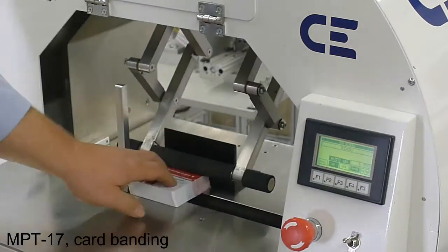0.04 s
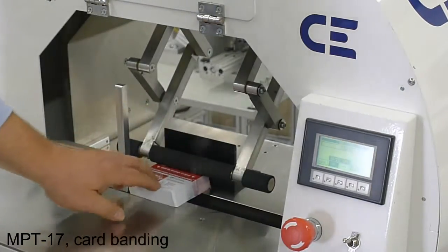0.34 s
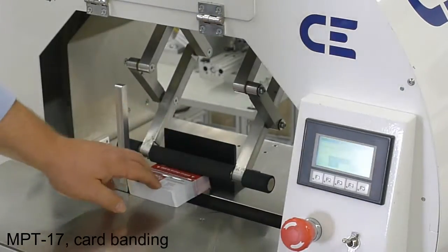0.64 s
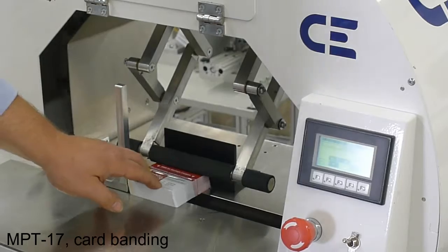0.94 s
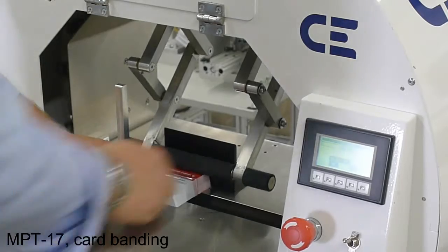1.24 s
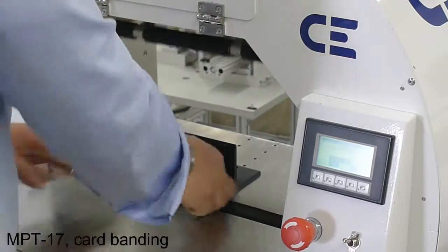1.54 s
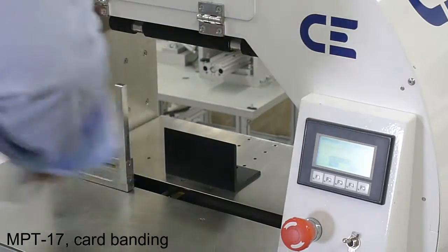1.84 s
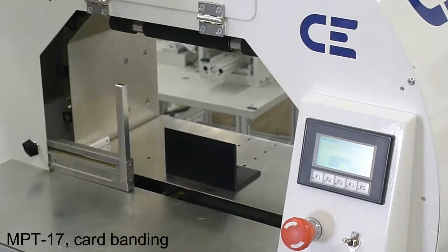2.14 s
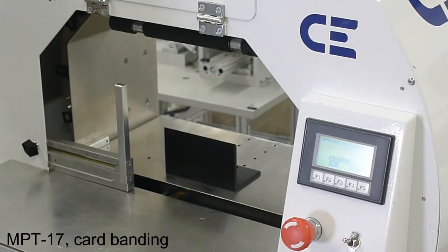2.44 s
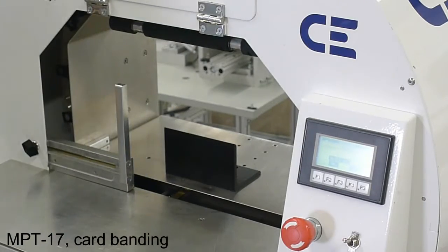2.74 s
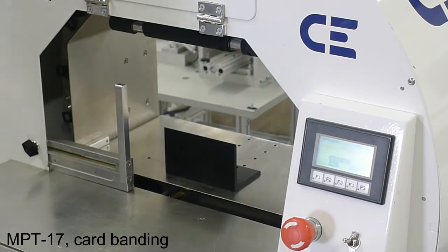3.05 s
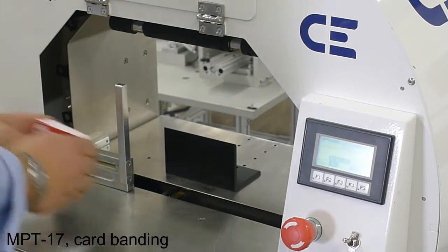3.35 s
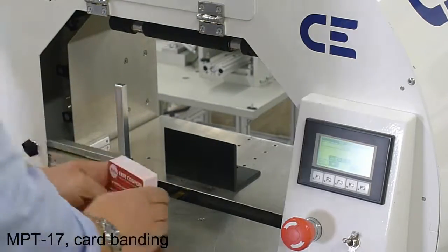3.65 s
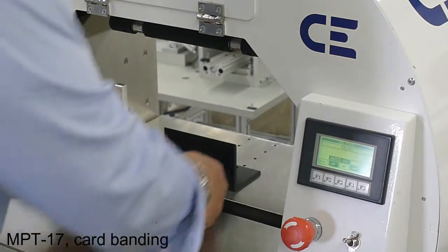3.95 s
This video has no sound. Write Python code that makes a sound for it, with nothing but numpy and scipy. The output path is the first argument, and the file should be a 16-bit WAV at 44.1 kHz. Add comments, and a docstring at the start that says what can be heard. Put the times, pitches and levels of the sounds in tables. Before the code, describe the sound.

A banding machine feeds film with a groaning rumble, cut off at 0.4 seconds by a valve snap and a hiss of air. From 0.7 to 1.5 seconds its arms rumble and clack against steel, with a tick and another air puff. It then idles with a faint hum and fan in a hard workshop. Cards rustle softly around 3 seconds and knock sharply on the table at 3.6.

```python
"""A film banding machine in a hard workshop, over a faint fan and room air. The film feed rumbles and
groans, then that sound cuts off abruptly; a valve snaps and air hisses out with a falling edge. The motor
starts to hum as the clamp and sealing arms travel and clack against the steel housing, with a relay tick
and one more puff of air. The machine idles while a pack of cards rustles in the hands and is knocked
down on its table."""
import sys
import numpy as np
from scipy import signal
from scipy.fft import rfft, irfft, next_fast_len
from scipy.io import wavfile
from scipy.ndimage import uniform_filter1d, map_coordinates

SR = 44100
rng = np.random.default_rng(int(sys.argv[2]) if len(sys.argv) > 2 else 0)


def transcribe(signal):
    """Save signal, clipped to [-1, 1], as a 16-bit WAV file at the path in sys.argv[1]."""
    frames = np.atleast_2d(signal).T
    limited = np.clip(frames, -1, 1)
    pcm = np.round(limited * 32767).astype(np.int16)
    wavfile.write(sys.argv[1], SR, pcm)


N = 176400
TIME = np.arange(N) / SR


def amp(db):
    """Decibels to gain."""
    return 10 ** (np.asarray(db) / 20)


def unit(x):
    """Scale to rms 1."""
    return x / np.sqrt(np.mean(x ** 2) + 1e-20)


def along(points, hz):
    """Read a curve of (f/Hz, value) points on a log frequency axis."""
    f, v = np.transpose(points)
    return np.interp(np.log(hz + 1), np.log(f + 1), v)


def level(rows):
    """A fader ride through (t/s, level/dB) points, muted from 30 ms beyond either end."""
    s, db = np.transpose(rows)
    return amp(np.interp(TIME, s, db)) * (TIME > s[0] - .03) * (TIME < s[-1] + .03)


def add(out, s, x):
    """Mix x into out from time s."""
    i = round(s * SR)
    out[i:i + len(x)] += x[:len(out) - i]


def filtered(x, response):
    """EQ x with a gain given as a function of frequency."""
    size = next_fast_len(len(x) + SR // 2)
    return irfft(rfft(x, size) * response(np.fft.rfftfreq(size, 1 / SR)), size)[:len(x)]


def noise(colour):
    """Noise of rms 1, coloured by (f/Hz, level/dB) points."""
    return unit(filtered(rng.standard_normal(N), lambda hz: amp(along(colour, hz))))


def wobble(rate):
    """A smooth random curve, rate knots a second."""
    knots = TIME * rate
    return map_coordinates(rng.standard_normal(int(knots[-1]) + 4), [knots])


def rings(rows, steady=0):
    """Resonances driven by noise; steady (0-1) evens out their swells."""
    hz, out = np.fft.fftfreq(N, 1 / SR), np.zeros(N)
    for centre, width, db in rows:
        band = np.fft.ifft(np.fft.fft(rng.standard_normal(N)) / (1 + (2 * (hz - centre) / width) ** 2))
        out += amp(db) * unit(band.real / np.abs(band) ** steady)
    return out


def swells(rows, width_hz=14):
    """Narrow resonances that each swell and fade once."""
    return sum(rings([(hz, width_hz, db)], steady=0.8) * np.exp(-((TIME - s) / half) ** 2)
               for s, half, hz, db in rows)


def causal(gain, size=2048):
    """Minimum-phase impulse response of energy 1: an EQ with no ring ahead of the attack."""
    cepstrum = irfft(np.log(gain(np.fft.rfftfreq(size, 1 / SR)) + 1e-6))
    cepstrum[1:size // 2] *= 2
    cepstrum[size // 2 + 1:] = 0
    impulse = irfft(np.exp(rfft(cepstrum)))
    return impulse / np.linalg.norm(impulse)


def blow(colour, t60, snap, bass_db=0, treble_db=0):
    """A sharp contact and its dense, quickly dying rattle."""
    t = np.arange(SR // 4) / SR
    rattle = rng.standard_normal(len(t)) * amp(-60 * t / t60)
    rattle[0] = snap
    tilt = [(300, bass_db), (1200, 0), (2500, 0), (8000, treble_db)]
    return signal.fftconvolve(rattle, causal(lambda hz: amp(along(colour, hz) + along(tilt, hz))))


def ringing(modes, relative_width=.012):
    """Struck steel, a little different at every blow; loose joints blur each mode's pitch."""
    t, out = np.arange(SR) / SR, np.zeros(SR)
    for hz, db, t60 in modes:
        drift = np.cumsum(rng.standard_normal(SR)) * np.sqrt(2 * np.pi * relative_width * hz / SR)
        phase = 2 * np.pi * (hz * t + rng.random()) + uniform_filter1d(drift, size=200)
        scatter_db = np.clip(rng.normal(0, 2.0), -2, 2)
        out += amp(db + scatter_db - 60 * t / t60) * np.sin(phase)
    return out * (1 - np.exp(-t / 0.0014))


def in_room(x, wet_db, build_s=0.0054):
    """x plus the reverb of the hard workshop, where the bass hangs longest."""
    decay = [(100, 1), (400, 0.65), (2000, 0.89), (4000, 0.82), (7000, 0.6), (12000, 0.74)]  # reverb time: f/Hz, t60/s
    hz, t, spectrum = signal.stft(rng.standard_normal(SR), SR, nperseg=256)
    tail = signal.istft(spectrum * amp(-60 * t / along(decay, hz)[:, None]), SR, nperseg=256)[1]
    tail *= 1 - np.exp(-np.arange(len(tail)) / SR / build_s)
    reverb = signal.fftconvolve(x, tail / np.linalg.norm(tail))
    return np.pad(x, (0, len(tail) - 1)) + amp(wet_db) * reverb


def film_feed():
    """Film drags through its guides: a fluttering rumble, groans, a short squeak, a thin air whistle."""
    ride = [(0, -27.5), (.04, -26.5), (.1, -25), (.135, -24), (.18, -27.5), (.215, -25.5), (.27, -26),
            (.41, -24.5), (.424, -28.5), (.436, -48.5), (.62, -44), (.7, -44)]  # fader on rumble and resonances: t/s, level/dB
    colour = [(24, -49), (40, -50), (69, -16), (162, -4.5), (241, -6), (417, -10), (496, -7), (881, -8.5),
              (973, -13.5), (4350, -25.5), (7520, -37.5), (12100, -46.5), (15500, -56)]  # rumble EQ: f/Hz, level/dB
    resonances = [(166, 26, -18.5), (398, 91, -16.5), (885, 38, -26), (2007, 80, -25)]  # excited by the feed: f/Hz, width/Hz, relative level/dB
    groans = [(.055, .025, 378, -22.5), (.137, .022, 382, -18.5), (.21, 0.058, 171.2, -21.5),
              (.25, 0.11, 420, -26), (.342, 0.027, 880, -27.5), (.405, 0.02, 424.5, -25)]  # one guide after another: t/s, half length/s, f/Hz, level/dB
    squeak_path = [(0.021, 1064, -34), (.045, 1072, -21), (.07, 1117, -22), (.1, 1120, -56)]  # rising squeak: t/s, f/Hz, level/dB
    whistle_band = [(11840, 600, -1.5)]  # air whistle: f/Hz, width/Hz, relative level/dB
    whistle_ride = [(0, -49), (.25, -55), (.42, -54)]  # its fader: t/s, level/dB
    rumble = amp(3.5) * noise(colour) * amp(0.69 * wobble(rate=72))
    body = rumble + amp(12.0) * rings(resonances, steady=0.44)
    s, hz, db = np.transpose(squeak_path)
    phase = 2 * np.pi * np.cumsum(np.interp(TIME, s, hz)) / SR
    squeak = np.sin(phase) * level(np.transpose([s, db]))
    return body * level(ride) + swells(groans) + squeak + rings(whistle_band) * level(whistle_ride)


def background():
    """The bed under everything: fan tones, a thin drive whine and the air of the workshop."""
    fan = [(550.6, 11, -64), (795.6, 23, -61.5), (1057, 11, -66.5)]  # fan tones: f/Hz, width/Hz, level/dB
    whine = [(14940, 20, -69)]  # drive whine: f/Hz, width/Hz, level/dB
    air_colour = [(25, -11), (55, 0.5), (120, 8), (170, 2), (330, 5), (600, -1), (1000, -1.5), (2000, -5.5),
                  (4500, -10), (8000, -17), (12000, -24), (15500, -28)]  # room tone EQ: f/Hz, level/dB
    air_ride = [(0, -60), (1.7, -52), (2.1, -49.5), (2.7, -49), (3.33, -47.5), (3.4, -43), (3.48, -46),
                (3.56, -47), (3.65, -51), (4, -48)]  # room tone fader: t/s, level/dB
    return rings(fan, steady=0.74) + rings(whine, steady=1) + noise(air_colour) * level(air_ride)


def exhaust():
    """Escaping air rasps above a sliding, unsteady resonance that weakens as the pressure falls."""
    ride = [(.414, -53), (.421, -23), (.426, -22.5), (.436, -28), (.475, -28.5), (.495, -26), (.54, -32),
            (.568, -21.5), (.6, -27), (.63, -32), (.67, -36.5), (.72, -40), (.8, -44)]  # hiss fader: t/s, level/dB
    edge = [(.425, 5650), (.44, 5900), (.468, 4280), (.484, 2200), (.53, 1820), (.565, 2370), (.585, 3220),
            (.64, 2080)]  # lowest resonance: t/s, f/Hz
    colour = [(300, -12), (2000, 1.5), (5000, -1.5), (9000, -7), (13000, -7), (15500, -13)]  # hiss EQ: f/Hz, level/dB
    width_octaves, jitter_octaves, fade_s = 0.075, 0.069, 0.076
    peak_db, below_edge_db, rasp_db = 8.5, -12.5, 3
    hz, t, spectrum = signal.stft(rng.standard_normal(N), SR, nperseg=256)
    octaves = np.log2((hz[:, None] + 1) / np.interp(t, *np.transpose(edge)))  # above the edge
    octaves += jitter_octaves * rng.standard_normal(len(t))
    pressure = np.exp(-np.maximum(t - edge[0][0], 0) / fade_s)
    peak = peak_db * pressure * np.exp(-.5 * (octaves / width_octaves) ** 2)
    shelf = below_edge_db * np.clip(-octaves / .5, 0, 1)
    # Random patches in frequency and time roughen the hiss.
    patches = uniform_filter1d(rng.standard_normal(spectrum.shape), size=3, axis=0)
    patches = unit(uniform_filter1d(patches, size=9, axis=1))
    spectrum *= amp(peak + shelf + rasp_db * patches + along(colour, hz)[:, None])
    hiss = signal.istft(spectrum, SR, nperseg=256)[1][:N]
    return unit(hiss) * level(ride)


def valve_snaps():
    """The exhaust valve snaps open, then spits again within the hiss."""
    snaps = [(0.419, -16.5), (0.4243, -30), (0.566, -30)]  # valve hits: t/s, level/dB
    colour = [(300, -19), (2500, 5), (6000, 1), (9000, -27), (13000, 2), (15500, -6)]  # snap EQ: f/Hz, level/dB
    out = np.zeros(N)
    for s, db in snaps:
        add(out, s, amp(db) * blow(colour, t60=0.025, snap=1.9))
    return out


def motor_hum():
    """The motor's low hum comes in with the arms and holds."""
    tone = [(119.46, 2.3, -50)]  # motor tone: f/Hz, width/Hz, level/dB
    ride = [(.62, -23), (.75, -0.5), (4, 1)]  # fader on that tone: t/s, level/dB
    return rings(tone, steady=1) * level(ride)


def arm_travel():
    """The swinging arms rumble along, make the frame boom and set a panel shuddering."""
    colour = [(40, -25), (90, 4.5), (380, 8.5), (600, 1.5), (1200, -1.5), (2000, -3), (2600, -9),
              (4500, -13), (8000, -27.5), (15000, -48)]  # rumble EQ: f/Hz, level/dB
    ride = [(.64, -56), (.69, -26.5), (.79, -25.5), (.9, -23), (1.04, -31.5), (1.1, -36), (1.19, -39.5),
            (1.32, -30), (1.43, -34.5), (1.52, -26.5), (1.6, -30), (1.7, -35), (1.8, -42), (2, -60)]  # rumble fader: t/s, level/dB
    frame_modes = [(83, 10, -9), (113.6, 1.9, -3.5), (138.7, 28, -1), (218, 10, -10)]  # frame resonances: f/Hz, width/Hz, relative level/dB
    boom_ride = [(.68, -61), (.83, -43), (.91, -26), (1.03, -27.5), (1.07, -32), (1.14, -29), (1.19, -41),
                 (1.25, -41), (1.42, -42), (1.58, -28), (1.7, -37), (1.9, -47.5)]  # boom fader: t/s, level/dB
    shudders = [(1.022, 0.025, 215, -24), (1.075, 0.041, 220, -28), (1.228, 0.015, 152, -30)]  # panel swells: t/s, half length/s, f/Hz, level/dB
    rumble = noise(colour) * level(ride)
    boom = unit(rings(frame_modes, steady=0.67)) * level(boom_ride)
    return rumble + boom + swells(shudders)


def arm_clacks():
    """The arms hit their stops: each clack rattles and rings both the housing and the struck part."""
    # arm hits: t/s, level/dB, bass/dB, treble/dB, rattle t60/s, part f/Hz, part relative level/dB
    clacks = [(0.6551, -19, -6.5, 0.5, 0.23, 1510, -12), (0.8063, -13.5, 3, 1, 0.069, 807, 2),
              (0.8106, -26, -3, 10, .05, 335, 8), (.8165, -16, -2, 11, 0.086, 678, -2),
              (.843, -20, 6, 5, 0.056, 695, -3), (0.9121, -16.5, 1.5, -2.5, 0.094, 468, -0.5),
              (0.917, -14, 2.5, -1, 0.088, 374, -1), (1.2979, -24, 2, -3, 0.24, 506, -5),
              (1.4504, -13.5, -3.5, 2, 0.12, 968, -1.5), (1.4559, -20, -2, -5, 0.094, 1820, -6)]
    colour = [(50, -34), (110, -25), (400, 9.5), (800, 1), (1700, 2), (3000, -2), (5500, -8), (8000, -16),
              (15000, -40.5)]  # clack EQ: f/Hz, level/dB
    housing = [(84.1, -4, 1), (115.9, 2, 0.99), (187, 7, 0.18), (262, -4, 0.28), (372.5, 2, 0.7),
               (468, -11, 0.17), (647, 2.5, 0.62), (1203, -2, 0.6), (1432, 4, 0.26), (1880, -4.5, 1),
               (2060, 1, 0.14), (2430, -3, 0.26), (3320, -14, 0.28), (4220, -2, 0.22), (4850, -11, .25)]  # steel housing modes: f/Hz, relative level/dB, t60/s
    housing_db, part_t60_s = -17, .12
    out = np.zeros(N)
    for s, db, bass_db, treble_db, t60, part_hz, part_db in clacks:
        hit = blow(colour, t60, snap=2.5, bass_db=bass_db, treble_db=treble_db)
        add(out, s, amp(db) * in_room(hit, wet_db=-6.5))
        steel = amp(housing_db) * ringing(housing) + ringing([(part_hz, part_db, part_t60_s)])
        add(out, s, amp(db) * steel)
    return out


def relay():
    """A relay switches with a tight, nearly dry double tick."""
    ticks = [(0.9789, -16.5), (.998, -35)]  # relay contacts: t/s, level/dB
    colour = [(300, 1), (3000, 7.5), (8000, -1), (15000, -22)]  # tick EQ: f/Hz, level/dB
    out = np.zeros(N)
    for s, db in ticks:
        add(out, s, amp(db) * in_room(blow(colour, t60=0.0088, snap=5.5), wet_db=-26))
    return out


def air_puff():
    """A valve lets one short puff of air into the room."""
    colour = [(120, -29), (200, -2), (798, -8), (1380, 0.5), (3120, 0.5), (3610, -1), (4500, -3.5),
              (5010, -3.5), (15500, -21)]  # puff EQ: f/Hz, level/dB
    ride = [(1.213, -62), (1.218, -30), (1.229, -32), (1.234, -19), (1.246, -22.5), (1.258, -28.5),
            (1.28, -43), (1.31, -70)]  # puff fader: t/s, level/dB
    return in_room(noise(colour) * level(ride), wet_db=-11.5)[:N]


def pack_rustle():
    """The cards shift in the hands: two soft, bright brushes."""
    rustles = [(2.488, .012, -60), (3.04, 0.055, -53)]  # card moves: t/s, half length/s, level/dB
    colour = [(500, -14), (2000, 4), (4500, 8), (7000, -4), (15000, -20)]  # rustle EQ: f/Hz, level/dB
    return noise(colour) * sum(amp(db) * np.exp(-((TIME - s) / half) ** 2) for s, half, db in rustles)


def pack_landing():
    """The pack lands edge after edge, milliseconds apart, and rings the table."""
    knocks = [(3.5734, -10.5), (3.5751, -8.5), (3.576, -13.5), (3.5771, -14.5), (3.5794, -15),
              (3.5845, -27), (3.589, -18.5)]  # edges landing: t/s, level/dB
    colour = [(50, -26), (110, -5.5), (330, 8), (560, 5.5), (720, 5), (940, -3.5), (1200, 0.5), (1850, 2),
              (2400, -6), (2800, -3.5), (4100, -6), (5200, -11.5), (6300, -18), (9000, -25.5), (15000, -44)]  # knock EQ: f/Hz, level/dB
    table_modes = [(114, 0, 1.12), (182, -11, 0.33), (212.5, -1.5, 0.78), (315, -7.5, 0.93),
                   (437, -3.5, 0.88), (997, -5, 0.8), (1152, 8.5, 0.056), (1384, 0, 0.36), (1665, -7, 0.72),
                   (1910, -2, .45), (2760, -5.5, 0.65), (4090, 6.5, 0.07), (5120, 5.5, 0.063)]  # ring of the table: f/Hz, relative level/dB, t60/s
    out = np.zeros(N)
    for s, db in knocks:
        add(out, s, amp(db) * in_room(blow(colour, t60=0.029, snap=5.4), wet_db=-4.5))
    add(out, knocks[0][0], amp(-26) * ringing(table_modes))
    return out


def scene():
    """Machine cycle, cards and idling bed, mixed in mono."""
    cycle = film_feed() + valve_snaps() + exhaust() + air_puff() + arm_travel() + arm_clacks() + relay()
    cards = pack_rustle() + pack_landing()
    return (cycle + cards + motor_hum() + background())[None]


def record(dry):
    """The recorder rounds off peaks, cuts a narrow notch in the treble and limits the band."""
    notch_hz, notch_width_hz, top_hz = 7450, 160, 15850
    rounded = dry[0] / (1 + np.abs(dry[0]) ** 6) ** (1 / 6)
    notched = signal.lfilter(*signal.iirnotch(notch_hz, notch_hz / notch_width_hz, SR), rounded)
    return filtered(notched, lambda hz: hz < top_hz)[None]


dry = scene()
out = record(dry)
transcribe(out)
```